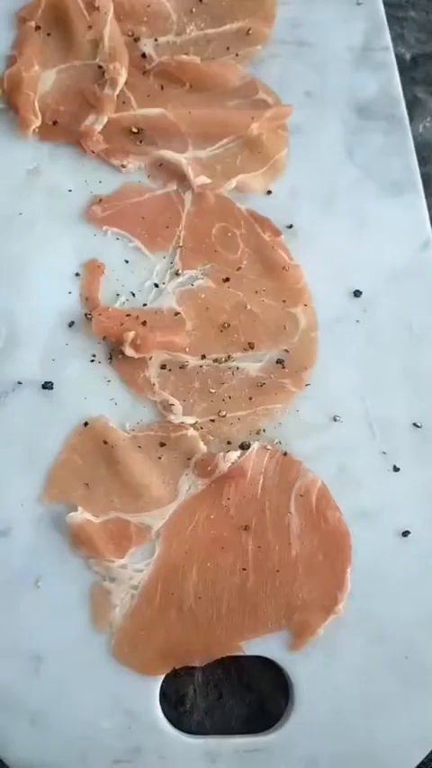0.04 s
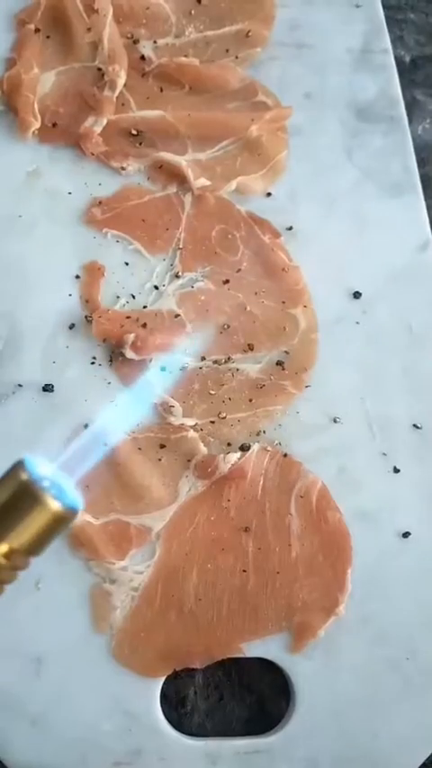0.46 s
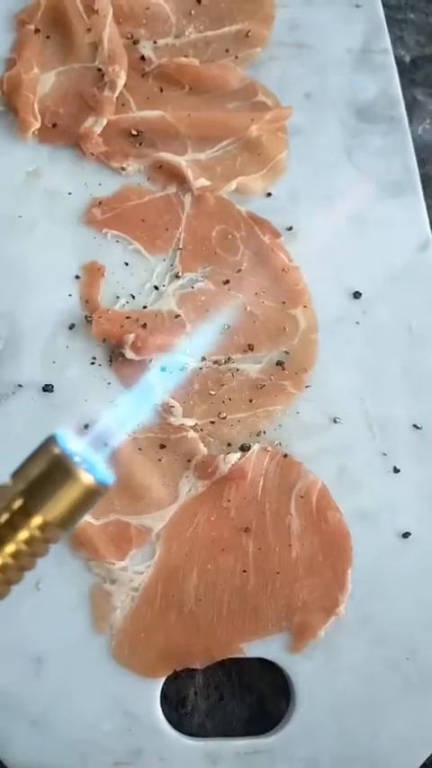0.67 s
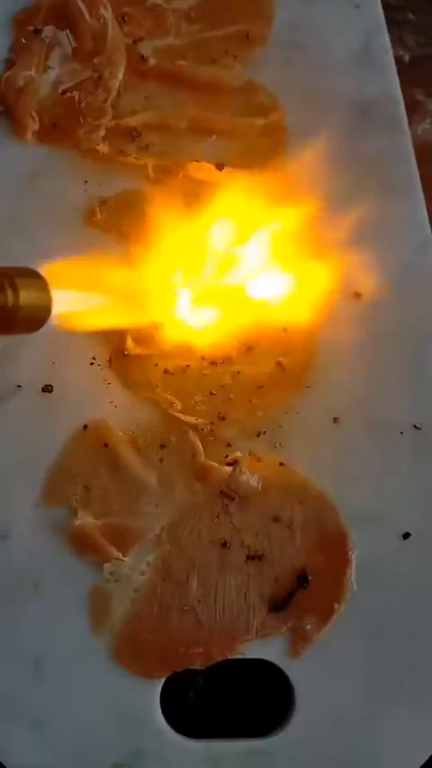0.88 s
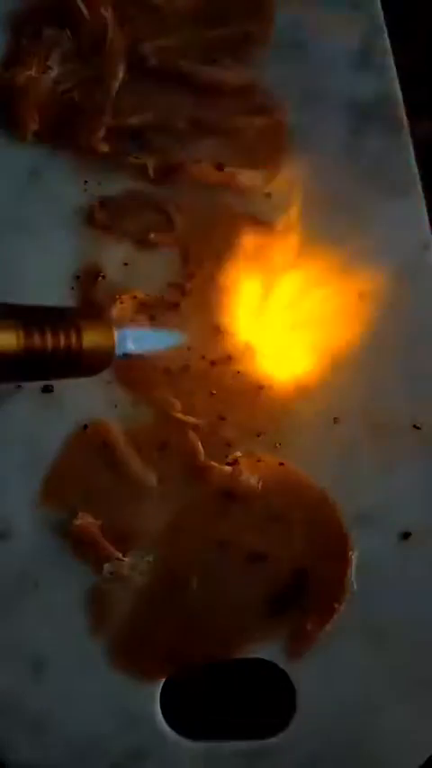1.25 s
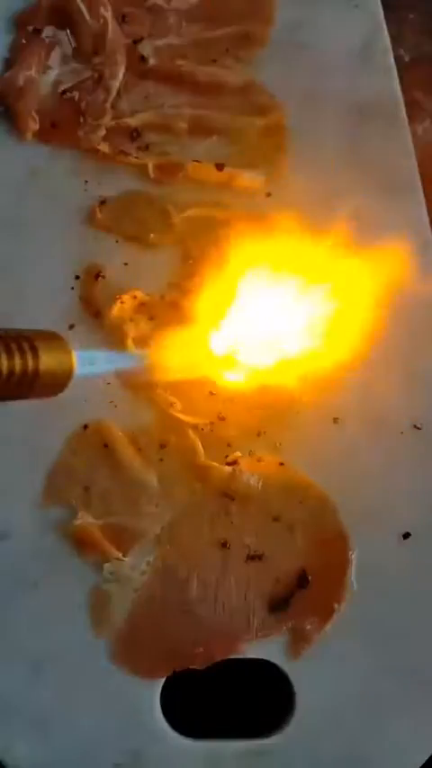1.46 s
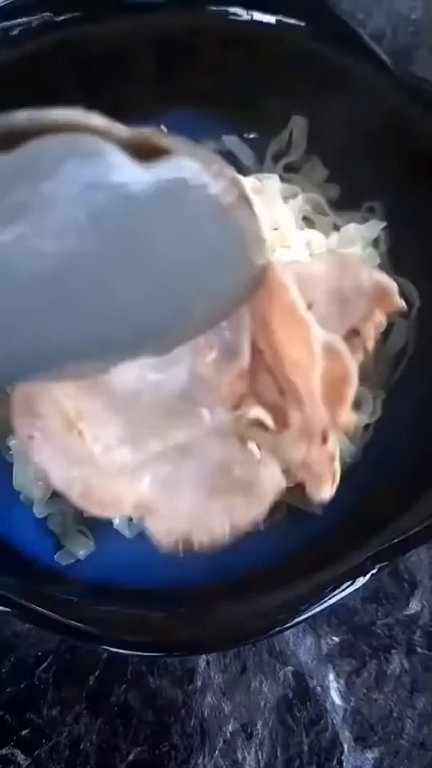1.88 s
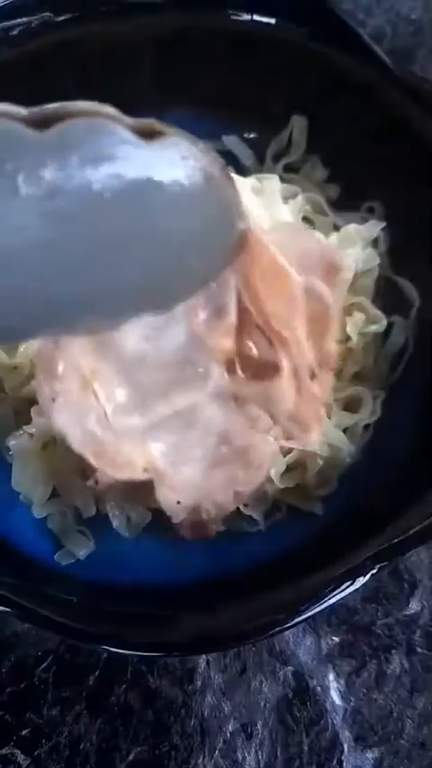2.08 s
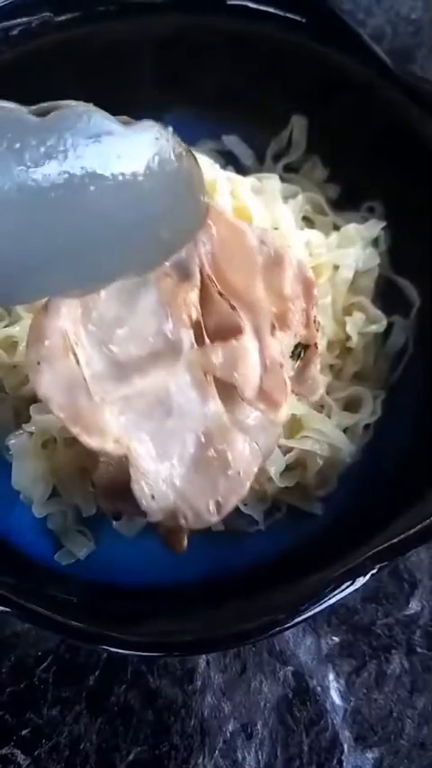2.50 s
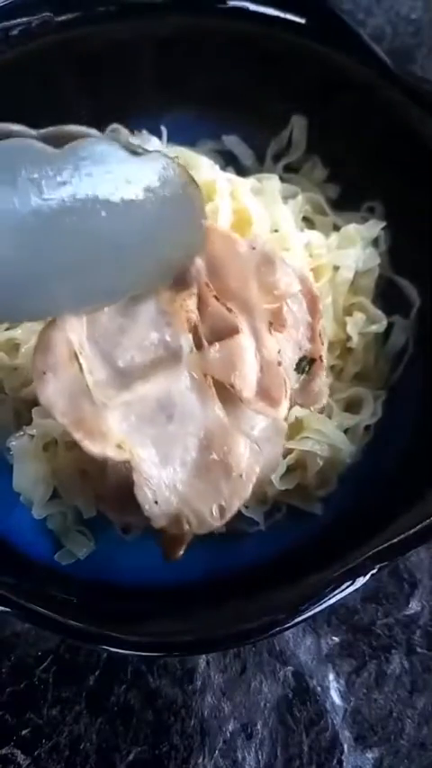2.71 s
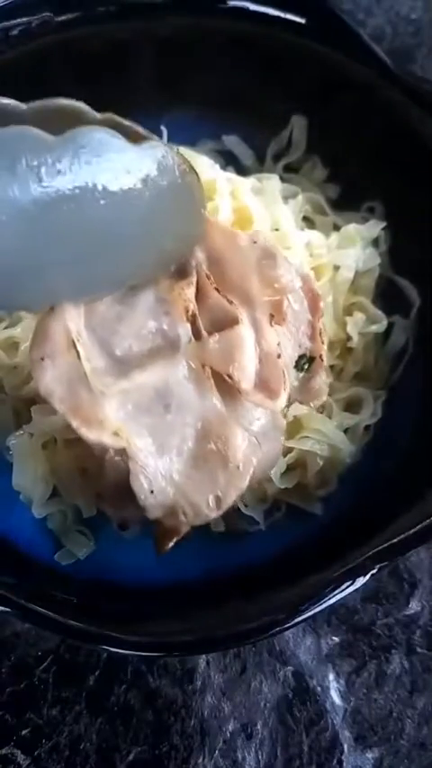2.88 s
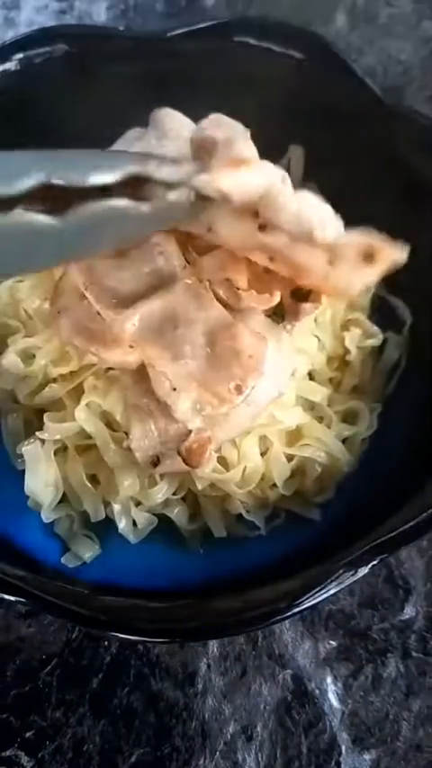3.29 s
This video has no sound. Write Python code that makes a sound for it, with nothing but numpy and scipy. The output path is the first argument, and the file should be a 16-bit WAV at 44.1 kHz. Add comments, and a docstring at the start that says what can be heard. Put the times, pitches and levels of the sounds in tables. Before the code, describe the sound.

A blowtorch hisses and roars close up, then gives way to a steady sizzle.

```python
"""Blowtorch searing meat

A gas torch close up in a kitchen, in short stretches that start and stop abruptly. A sputter, a gap,
then the bare blue flame rushes while the nozzle whistles. On the meat, eddies shake a deeper roar
over the hiss of the gas jet. Tiny bursting bubbles, steam and spitting fat then make a steady
sizzle; a much fainter hiss ends it."""
import sys
import numpy as np
from scipy import signal
from scipy.fft import rfft, irfft
from scipy.io import wavfile

SR = 44100
rng = np.random.default_rng(int(sys.argv[2]) if len(sys.argv) > 2 else 0)


def inscribe(sig):
    """Save sig as 16-bit PCM at rate SR to the path in sys.argv[1].

    A 1-D sig is mono; a 2-D sig holds one channel per row.
    Samples are clipped to [-1, 1] before scaling.
    """
    pcm = np.round(np.clip(np.atleast_2d(sig).T, -1, 1) * 32767)
    wavfile.write(sys.argv[1], SR, pcm.astype(np.int16))


N = 152145
TIME = np.arange(N) / SR
BIN_HZ = np.fft.rfftfreq(N, 1 / SR)

# Each span: start, end.
SPUTTER_SPAN_S, BLUE_SPAN_S, SEAR_SPAN_S = (0.0, 0.039), (0.198, 0.8113), (0.8113, 1.879)
SIZZLE_SPAN_S, FAINT_SPAN_S = (1.883, 3.187), (3.187, 3.46)
EDDY_HZ, JET_FLUTTER_DB = 90, 0.5


def amp(db):
    """Decibels to gain."""
    return 10 ** (np.asarray(db) / 20)


def unit_rms(x):
    """Scale to rms 1."""
    return x / np.sqrt(np.mean(x ** 2) + 1e-20)


def curve(rows, column=1):
    """One table column, interpolated linearly in time."""
    rows = np.array(rows)
    return np.interp(TIME, rows[:, 0], rows[:, column])


def gate(span_s, edge_s=0.0021):
    """Open over a span, with abrupt edges."""
    return np.clip(np.minimum(TIME - span_s[0], span_s[1] - TIME) / edge_s + .5, 0, 1)


def coloured(x, spectrum, skirt_db_per_octave=60):
    """Shape x by a spectrum with steep skirts beyond its ends; rms 1."""
    hz = BIN_HZ + 1
    knot_hz, knot_db = np.transpose(spectrum)
    octaves_out = np.maximum(np.log2(knot_hz.min() / hz), 0) + np.maximum(np.log2(hz / knot_hz.max()), 0)
    gain_db = np.interp(np.log(hz), np.log(knot_hz), knot_db) - skirt_db_per_octave * octaves_out
    return unit_rms(irfft(rfft(x) * amp(gain_db), N))


def noise(spectrum):
    """Steady coloured noise; rms 1."""
    return coloured(rng.standard_normal(N), spectrum)


def flutter(rate_hz):
    """Random unsteadiness, rolling off above rate_hz; rms 1."""
    shape = BIN_HZ / (BIN_HZ + 5) / (1 + (BIN_HZ / rate_hz) ** 2)
    return unit_rms(irfft(rfft(rng.standard_normal(N)) * shape, N))


def shelf(x, side, gain_db, corner_hz):
    """Time-varying gain on one side of the spectrum."""
    band = signal.sosfiltfilt(signal.butter(2, corner_hz, side, fs=SR, output="sos"), x)
    return x + band * (amp(gain_db) - 1)


def reflections(count=20, spread_s=.025):
    """Echo taps from board and walls."""
    taps = np.zeros(N)
    taps[(SR * spread_s * (rng.random(count) + .1)).astype(int)] = rng.choice([-1., 1.], count)
    return taps


def kitchen(x, patterns=3, echo_db=-7.5, drift_hz=2.494, treble_hz=6000):
    """Early reflections ripple the spectrum, drifting as the hands move; rms 1."""
    lowpass = 1 / np.sqrt(1 + (BIN_HZ / treble_hz) ** 2)
    out = x
    for k in range(patterns):
        echo = unit_rms(irfft(rfft(x) * rfft(reflections()), N))
        crossfade = np.cos(np.pi * (drift_hz * TIME + k / patterns)) * np.sqrt(2 / patterns)
        out = out + amp(echo_db) * crossfade * irfft(rfft(echo) * lowpass, N)
    return unit_rms(out)


def rumble(level_db=-63.5):
    """Low kitchen rumble from the start of the sizzle on."""
    # Each row: frequency in Hz, relative density in dB.
    spectrum = [(25, -5), (45, 0.5), (65, 1), (85, -7.5), (120, -15.5)]
    return amp(level_db) * noise(spectrum) * (TIME > SIZZLE_SPAN_S[0])


def thumps():
    """Soft low thumps as stretches of sound start and stop abruptly."""
    # Each row: start and end in seconds, linear offset scale, rise and decay times in seconds.
    offsets = [(0.201, 0.811, -0.054, 0.078, 0.53), (1.89, 3.187, -0.011, 0.0022, .42),
               (3.196, 3.6, -0.0078, 0.0025, .5)]
    out = np.zeros(N)
    for start_s, end_s, offset, rise_s, decay_s in offsets:
        age_s = np.maximum(TIME - start_s, 0)
        out += offset * (1 - np.exp(-age_s / rise_s)) * np.exp(-age_s / decay_s) * gate((0, end_s))
    return out


def ticks(cutoff_hz=2420):
    """Dry ticks as the searing starts and the sizzle stops."""
    # Each row: time in seconds, relative level in dB.
    events = [(0.8111, -27), (3.185, -33.5)]
    impulses = np.zeros(N)
    for time_s, db in events:
        impulses[int(time_s * SR)] = amp(db)
    return 4 * signal.lfilter(*signal.butter(1, cutoff_hz, fs=SR), impulses)


def faint_hiss(flutter_db=1.3, room_db=-65):
    """A distant, uneven hiss over the quiet of the kitchen."""
    # Each row: frequency in Hz, relative density in dB.
    hiss_spectrum = [(1650, -58), (2800, -38), (3830, -29), (4970, -21), (5360, -7.5), (5810, -16),
                     (6180, -4), (6700, -6.5), (7550, 6), (8100, -7), (8700, -39), (11300, -61),
                     (19100, -120)]
    room_spectrum = [(60, -6), (130, 2.5), (260, -3.5), (430, 2), (800, -3), (1050, -9.5), (1350, -9),
                     (1700, -18), (2800, -28)]
    # Each row: time in seconds, level in dB.
    levels = [(3.187, -54.5), (3.205, -57), (3.225, -58), (3.243, -50.5), (3.27, -57.5), (3.37, -58.5),
              (3.385, -50), (3.405, -57.5), (3.45, -58)]
    hiss = noise(hiss_spectrum) * amp(curve(levels) + flutter_db * flutter(rate_hz=60))
    return (hiss + amp(room_db) * noise(room_spectrum)) * gate(FAINT_SPAN_S)


def spits(gain_db=5.5):
    """Fat spits in broadband puffs that start at once and die away."""
    # Each row: start in seconds, relative level in dB, decay time in seconds.
    puffs = [(2.015, -49, .04), (2.287, -51, .02), (2.525, -57, .012), (2.567, -49, 0.012),
             (2.9, -50.5, .012), (2.924, -49, .01), (3.189, -38, 0.0023)]
    # Each row: frequency in Hz, relative density in dB.
    spectrum = [(300, -9), (700, -5), (2000, -8), (3000, -11), (4500, 1), (7500, 9.5), (8500, -17)]
    envelope = sum(amp(db) * (TIME >= start_s) * np.exp(-abs(TIME - start_s) / decay_s)
                   for start_s, db, decay_s in puffs)
    return noise(spectrum) * envelope * amp(gain_db)


def sizzle(bubbles_per_s=2000, spread_db=2.5, bubble_share=0.39, flutter_db=1.16, wash_db=-60.5):
    """Thousands of tiny bubbles burst over a hiss of steam and a soft low wash."""
    # Each row: frequency in Hz, relative density in dB.
    hiss_spectrum = [(1650, -51), (2800, -42.5), (3040, -37.5), (3390, -32.5), (4670, -21), (5110, -19),
                     (6580, -2), (7440, 4.5), (7910, -3), (8500, -27), (8700, -52), (11300, -70.5),
                     (19100, -120)]
    wash_spectrum = [(71, -40.5), (120, -6), (248, -1.5), (310, -7.5), (378, 0), (505, -8.5), (675, 1),
                     (1130, -2), (1530, -9.5), (2120, -5), (2590, -14.5), (2800, -12), (3640, -41.5),
                     (6160, -120)]
    # Each row: time in seconds, level in dB.
    levels = [(1.88, -32.5), (1.98, -35), (2.04, -32), (2.2, -34), (2.4, -34.5), (2.5, -32.5), (2.7, -33),
              (3.18, -32.5)]
    sizes = amp(spread_db * np.minimum(rng.exponential(1, N), 5)) * rng.choice([-1., 1.], N)
    bursts = rng.random(N) < bubbles_per_s / SR
    bubbles = coloured(sizes * bursts, hiss_spectrum)
    steam = noise(hiss_spectrum)
    hiss = kitchen(np.sqrt(bubble_share) * bubbles + np.sqrt(1 - bubble_share) * steam)
    hiss *= amp(curve(levels) + flutter_db * flutter(rate_hz=29))
    wash = amp(wash_db) * kitchen(noise(wash_spectrum))
    return (hiss + wash + spits()) * gate(SIZZLE_SPAN_S)


def nozzle(x):
    """Narrow resonances and dips of the torch."""
    # Each row: centre in Hz, width in Hz, gain in dB.
    bands = [(312, 25, 1.5), (710, 25, -1), (770, 35, 2), (1360, 30, 2.5), (2850, 330, 0.5),
             (5820, 54, -0.5), (7580, 140, 1), (7860, 240, 0), (8060, 140, -7.5), (8270, 60, 3.5),
             (8700, 180, -18)]
    gain_db = sum(db * np.exp(-((BIN_HZ - hz) / width_hz) ** 2) for hz, width_hz, db in bands)
    return irfft(rfft(x) * amp(gain_db), N)


def gas(spectrum):
    """Turbulent gas, coloured by the torch and its surroundings."""
    return kitchen(nozzle(noise(spectrum)))


def sputter():
    """A scrap of rushing gas and flame."""
    # Each row: frequency in Hz, relative density in dB.
    spectrum = [(59, -53), (100, -20), (232, -4.5), (377, -11.5), (907, -0.5), (1160, -20), (1560, -2),
                (3360, -31.5), (3900, -18), (4440, -26), (6460, -10), (7090, 5.5), (8710, -22.5),
                (11300, -48), (19200, -120)]
    # Each row: time in seconds, level in dB.
    levels = [(0.0, -42.5), (0.01, -41), (0.021, -45), (0.031, -42.5), (0.039, -33)]
    return noise(spectrum) * amp(curve(levels)) * gate(SPUTTER_SPAN_S)


def whistle(width_hz=170):
    """Fuzzy nozzle whistle: a narrow noise band on a gliding pitch."""
    # Each row: time in seconds, pitch in Hz, level in dB.
    glide = [(0.2, 7450, -38), (0.32, 7360, -34), (0.41, 7710, -34.5), (0.8, 7590, -34.5)]
    carrier = np.exp(2j * np.pi * np.cumsum(curve(glide)) / SR)
    fuzz = flutter(width_hz / 2) + 1j * flutter(width_hz / 2)
    return unit_rms(nozzle((carrier * fuzz).real)) * amp(curve(glide, column=2))


def blue_flame(jet_trim_db=-1.5, roar_flutter_db=1.5):
    """The jet hisses and whistles in the nozzle while the bare flame rushes, shaken by eddies."""
    # Each row: frequency in Hz, relative density in dB.
    jet_spectrum = [(1650, -82.5), (2800, -47), (3180, -31), (4210, -28), (4540, -17.5), (4880, -19),
                    (5760, -6.5), (7060, -3.5), (7510, -1), (7910, -5), (8260, -14), (8500, -28.5),
                    (8700, -45), (11300, -58.5), (19100, -120)]
    roar_spectrum = [(53, -41.5), (90, -9), (113, -19.5), (167, -4.5), (289, -0.5), (491, -2.5),
                     (674, -8.5), (746, -3.5), (938, -14.5), (1080, -7.5), (1440, -24.5), (1670, -20.5),
                     (1900, -26.5), (2460, -30), (2800, -47), (3640, -83), (6160, -120)]
    # Each row: time in seconds, jet level before trim in dB, roar level in dB.
    levels = [(0.2, -40, -39.5), (0.22, -36, -40.5), (0.368, -32.5, -38), (0.714, -30.5, -37.5),
              (0.8, -31.5, -36)]
    eddies = flutter(EDDY_HZ)
    jet = gas(jet_spectrum) * amp(curve(levels) + jet_trim_db + JET_FLUTTER_DB * eddies)
    roar = gas(roar_spectrum) * amp(curve(levels, column=2) + roar_flutter_db * eddies)
    return (jet + roar + whistle()) * gate(BLUE_SPAN_S)


def searing(roar_flutter_db=1.22, beam_db_per_db=.5):
    """The flame breaks on the meat: eddies shake a deeper roar and, less so, the hiss."""
    # Each row: frequency in Hz, relative density in dB.
    roar_spectrum = [(24, -59), (40, -22), (123, -13.5), (202, -2), (309, 0), (344, -1.5), (546, -3.5),
                     (687, -10.5), (751, -9.5), (947, -10), (1070, -20.5), (1860, -26), (2140, -35.5),
                     (2430, -30), (2800, -42), (3640, -78), (6160, -120)]
    jet_spectrum = [(1650, -71), (2800, -43.5), (3320, -29), (3630, -29.5), (3940, -22), (4810, -22.5),
                    (5090, -14), (5470, -14), (5900, -5), (6550, -4), (7300, 2.5), (7650, 1.5),
                    (7950, -5.5), (8500, -28), (8700, -53.5), (11300, -71.5), (19100, -120)]
    # Each row: time in seconds, gain in dB.
    roar_gains = [(0.811, -49), (0.828, -33), (0.86, -32.5), (1.0, -35.5), (1.3, -34), (1.42, -33.5),
                  (1.52, -35), (1.6, -32.5), (1.67, -33.5), (1.8, -32), (1.88, -34)]
    jet_gains = [(0.811, -38), (0.826, -26.5), (0.86, -25), (0.95, -27), (1.15, -29.5), (1.34, -33),
                 (1.52, -29), (1.68, -26.5), (1.82, -24), (1.845, -20.5), (1.88, -29)]
    upper_gains = [(0.82, -2), (0.95, 3.5), (1.079, 7), (1.2, 1.5), (1.45, 1.5), (1.6, 0), (1.8, 2),
                   (1.88, -2.5)]
    deep_gains = [(0.82, -1), (1.0, -0.5), (1.3, -0.5), (1.43, 1.5), (1.6, 2.5), (1.7, -1), (1.88, -0.5)]
    eddies = flutter(EDDY_HZ)
    active = gate(SEAR_SPAN_S)
    roar = shelf(gas(roar_spectrum), "high", curve(upper_gains), corner_hz=1200)
    roar = shelf(roar, "low", curve(deep_gains), corner_hz=400)  # swells as the flame flares
    roar *= amp(curve(roar_gains) + roar_flutter_db * eddies)
    # The jet's treble is beamed, so the hiss dulls as it gets quieter.
    jet_db = curve(jet_gains)
    dulling_db = beam_db_per_db * (jet_db[active > 0].mean() - jet_db)
    jet = shelf(gas(jet_spectrum), "low", dulling_db, corner_hz=6200)
    jet *= amp(jet_db + JET_FLUTTER_DB * eddies)
    return (roar + jet) * active


def scene():
    """Torch, sizzle and faint hiss in turn, plus background; mono."""
    foreground = sputter() + blue_flame() + searing() + sizzle() + faint_hiss()
    return (foreground + rumble() + thumps() + ticks())[None]


def record(dry):
    """Steep low-pass."""
    cutoff_hz = 8620
    lowpass = signal.firwin(511, cutoff_hz, window=("kaiser", 9), fs=SR)
    return signal.oaconvolve(dry, lowpass[None], "same")


dry = scene()
out = record(dry)
inscribe(out)
```